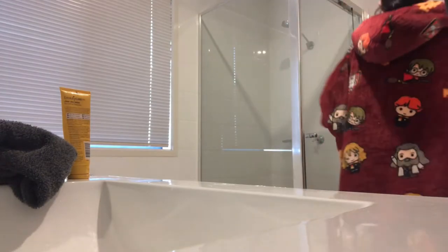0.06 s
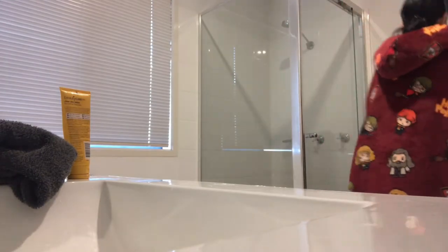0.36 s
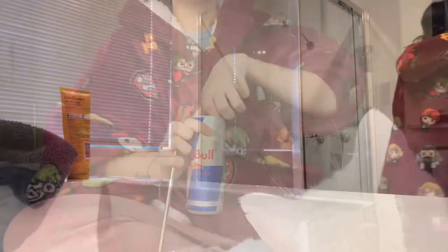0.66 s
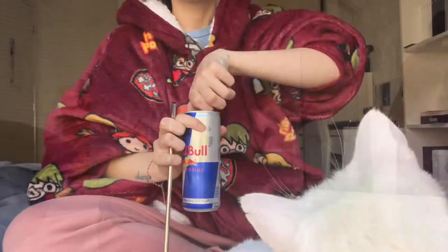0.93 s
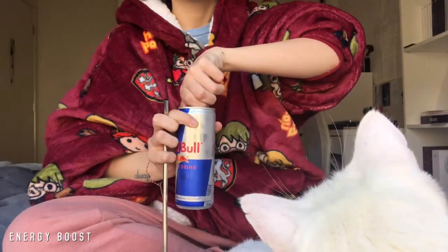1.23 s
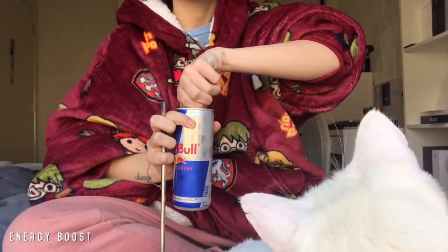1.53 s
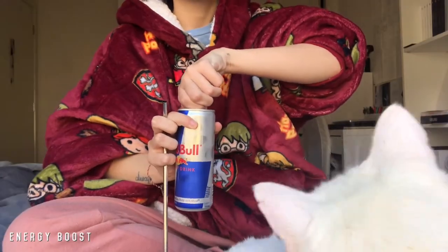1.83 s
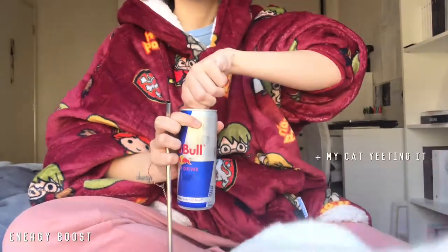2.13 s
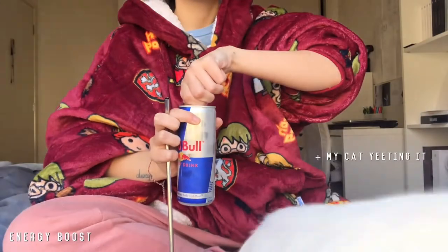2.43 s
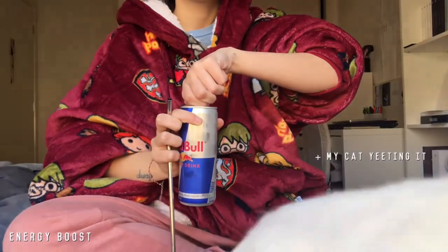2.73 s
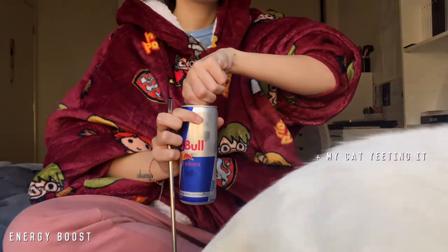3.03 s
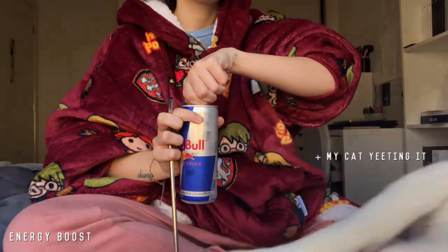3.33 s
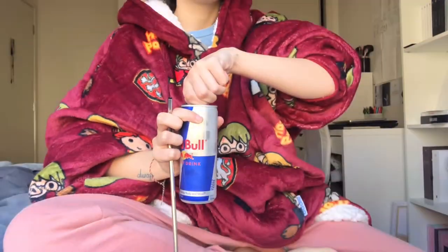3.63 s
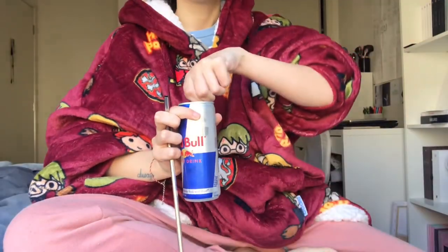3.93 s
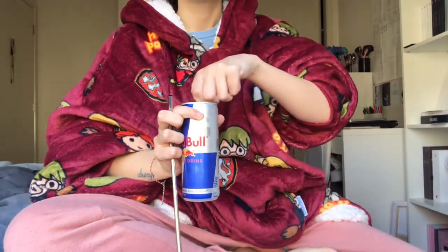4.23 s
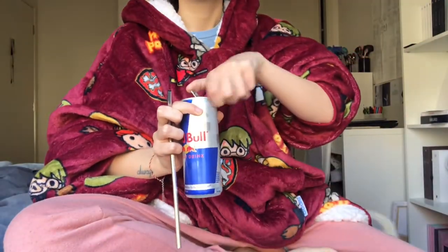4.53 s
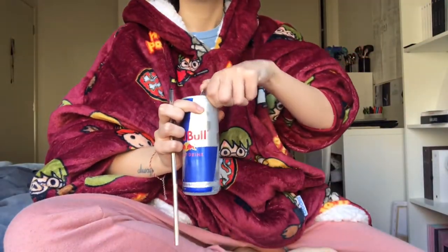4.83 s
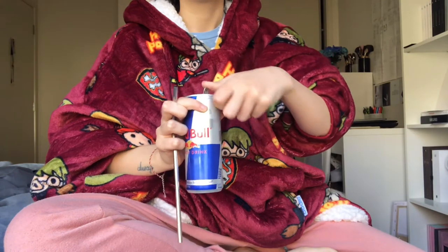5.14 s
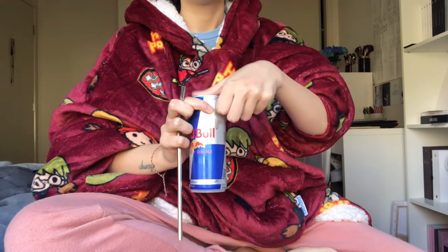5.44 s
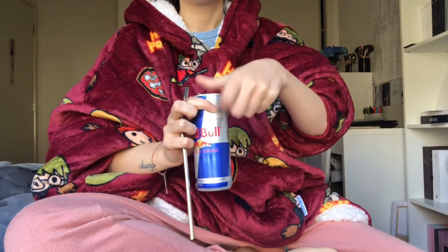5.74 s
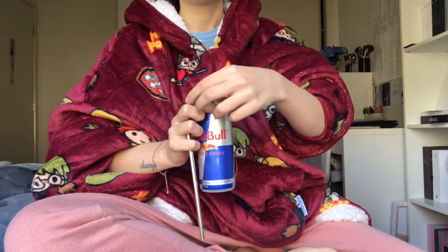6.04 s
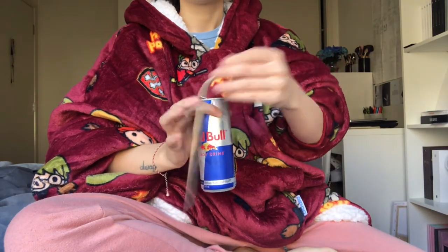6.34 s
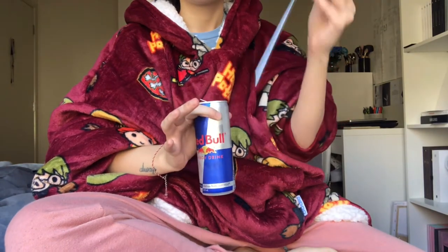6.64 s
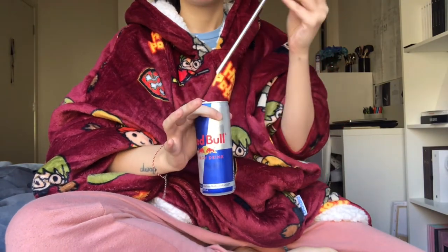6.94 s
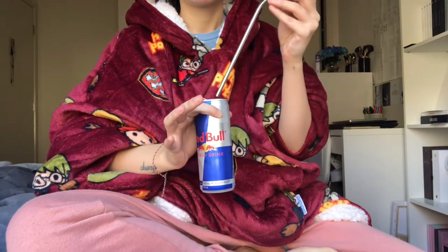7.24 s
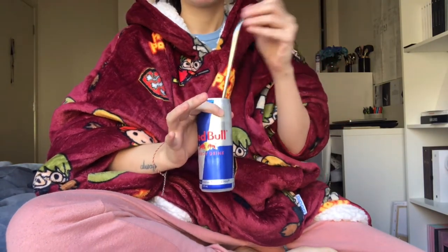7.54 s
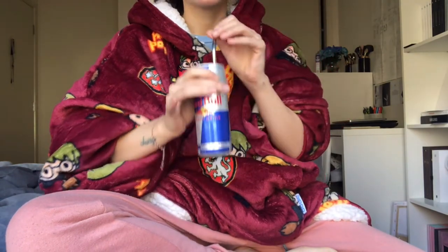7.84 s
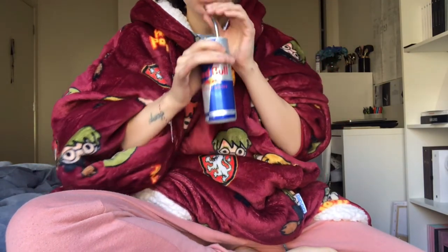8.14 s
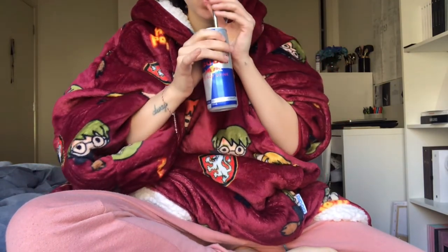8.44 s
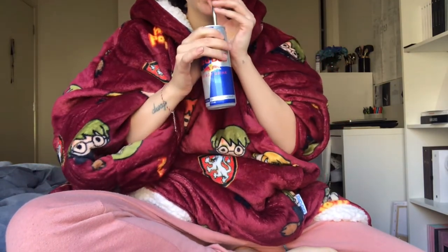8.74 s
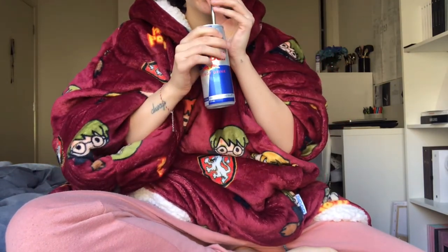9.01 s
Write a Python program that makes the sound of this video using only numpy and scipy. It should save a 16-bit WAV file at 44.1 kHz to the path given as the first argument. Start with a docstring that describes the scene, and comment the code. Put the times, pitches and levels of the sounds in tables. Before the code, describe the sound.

A faint low bathroom rumble opens the scene, with a soft swish of a robe at about 0.3 seconds, and fades by 1 second into a quiet bedroom. At 1.7 seconds a drink can cracks open, the loudest sound, with a short spit of gas and a few soft thumps. More muffled bumps come near the microphone around 3.4 seconds, probably a cat shifting. From 3.7 to 3.9 the lid tears in with crunchy metallic snaps, and at 4.1 the tab claps back. Fingers tap the can lightly at 4.8 and 5.6, each with a hollow note. A metal straw clinks on the can at 6.3 seconds, knocks the rim at 7.3 and slides in with a light, gritty scrape. Around 7.8 it rattles, making the can ring hollowly like a bottle. Fainter rubs and ticks last until 8.6, leaving still air.

```python
"""A robe swishes over the low rumble of a bathroom, which fades into a quiet bedroom. There a drink can
cracks open with a spit of gas, its lid tears in and the tab claps back. A metal straw clinks on the can,
slides into the opening and rattles there, making the air above the drink ring like a bottle. Soft thumps
come from the can jolting open, a finger on it, and probably a cat shifting near the microphone."""
import sys
import numpy as np
from scipy import signal
from scipy.fft import rfft, irfft, next_fast_len
from scipy.io import wavfile
from scipy.ndimage import uniform_filter1d, map_coordinates

SR = 44100
rng = np.random.default_rng(int(sys.argv[2]) if len(sys.argv) > 2 else 0)


def pcm_store(signal):
    """Save signal as 16-bit PCM."""
    levels = np.round(np.clip(np.atleast_2d(signal), -1, 1) * 32767)
    wavfile.write(sys.argv[1], SR, levels.astype(np.int16).T)


N = 408835
TIME = np.arange(N) / SR
EVENT_TIME = TIME[:SR // 3]  # clock for one short sound


def undb(db):
    """Decibels to gain."""
    return 10 ** (np.asarray(db) / 20)


def unit(x):
    """Scale to rms 1."""
    return x / np.sqrt(np.mean(x ** 2))


def fade(t60):
    """Exponential decay by 60 dB in t60 seconds."""
    return np.exp(-np.log(1000) * EVENT_TIME / t60)


def envelope(s, attack_s, hold_s, t60):
    """Rise from time s, hold at 1, then die by 60 dB in t60 seconds."""
    rise = np.clip((TIME - s) / attack_s, 0, 1) ** 2
    return rise * np.exp(-np.log(1000) * np.clip((TIME - s - attack_s - hold_s) / t60, 0, 2))


def swell(rise_s, length_s):
    """The outline of a soft push: it swells and stops."""
    return (1 - np.exp(-EVENT_TIME / rise_s)) * np.exp(-(EVENT_TIME / length_s) ** 3)


def stroke(s, length_s):
    """The speed of one small hand movement: an arch from 0 to 1 and back."""
    return np.sin(np.pi * np.clip((TIME - s) / length_s, 0, 1))


def flutter(size):
    """Quick random unevenness, smoothed over size samples; spread 1."""
    return unit(uniform_filter1d(rng.standard_normal(N), size=size))


def at(s, sound):
    """A silent track with the sound placed at time s."""
    out = np.zeros(N)
    start = int(s * SR)
    out[start:start + len(sound)] = sound[:N - start]
    return out


def through(x, response):
    """Pass a sound through a response."""
    return signal.fftconvolve(x, response)[:len(x)]


def spectrum(colour, size):
    """Gain at each FFT bin for a colour of f/Hz, level/dB."""
    hz, db = np.transpose(colour)
    bin_hz = np.fft.rfftfreq(size, 1 / SR) + 1
    return undb(np.interp(np.log(bin_hz), np.log(hz), db))


def noise(colour):
    """Noise of rms 1 with a colour of f/Hz, level/dB."""
    size = next_fast_len(N, True)
    return unit(irfft(rfft(rng.standard_normal(size)) * spectrum(colour, size), size)[:N])


def note(hz, length_s, rise_s=.0022):
    """A short hollow note."""
    return swell(rise_s, length_s) * np.sin(2 * np.pi * hz * EVENT_TIME)


def ring(modes, colour_db=lambda hz: 0, pitch=1, scatter_db=0):
    """Decaying modes, weighted by colour and by where the blow lands; neighbours swing opposite ways."""
    place_db = scatter_db * rng.standard_normal(len(modes))
    out = np.zeros(len(EVENT_TIME))
    for k, (hz, db, t60) in enumerate(modes):
        gain = (-1) ** k * undb(db + colour_db(hz) + place_db[k])
        out += gain * fade(t60) * np.sin(2 * np.pi * pitch * hz * EVENT_TIME)
    return out


def contact(t60, crackle_db):
    """One push followed by a dying spray of tiny slips."""
    slips = rng.standard_normal(len(EVENT_TIME)) ** 3 * fade(t60)
    push = undb(crackle_db) * slips / np.linalg.norm(slips)
    push[0] += 1
    return push


def clack(colour, t60, size=1024):
    """Crowded modes of thin metal, too short-lived to be heard as notes: a dying, coloured burst."""
    cepstrum = irfft(np.log(spectrum(colour, size)))
    causal_response = irfft(np.exp(rfft(2 * cepstrum[:size // 2], size)))
    burst = through(rng.standard_normal(len(EVENT_TIME)) * fade(t60), causal_response)
    return burst * np.linalg.norm(fade(t60)) / np.linalg.norm(burst)


# still air around the microphone: f/Hz, level/dB
ROOM_TONE_COLOUR = [(15, -50), (25, -29), (37, -11), (50, -1), (62, -4.5), (90, -4.5), (160, -5.5),
                    (240, -4.5), (500, -7), (1630, -19.5), (3000, -23.5), (7730, -28), (8400, -31),
                    (15500, -36)]


def room_tone(db=-68.5):
    """A faint, low wash of still air under both rooms."""
    return undb(db) * noise(ROOM_TONE_COLOUR)


# low background of the bathroom: f/Hz, level/dB
RUMBLE_COLOUR = [(30, -22.5), (50, -12), (68, 4), (95, -0.5), (150, -1), (300, -8), (700, -16.5),
                 (1500, -26), (4000, -54)]


def bathroom_rumble(start_db=-63, sag_db_per_s=13, hum_hz=67.7, hum_db=-7.5, waver=.4):
    """A rumble with a wavering hum, perhaps a fan, sinks slowly and then fades away."""
    below_hz, above_hz = hum_hz * (1 - waver / 2), hum_hz * (1 + waver / 2)
    hum = noise([(hum_hz / 2, -60), (below_hz, -40), (hum_hz, 0), (above_hz, -40), (hum_hz * 2, -90)])
    rumble = noise(RUMBLE_COLOUR) + undb(hum_db) * hum
    return rumble * undb(start_db - sag_db_per_s * TIME) * envelope(0, 1 / SR, hold_s=.82, t60=.6)


# brushing cloth: f/Hz, level/dB
ROBE_COLOUR = [(150, -27.5), (400, -6), (730, -5), (1900, -8), (2500, -8.5), (3400, -6), (8000, -13.5),
               (15500, -20.5)]
# swishes in the bathroom: t/s, level/dB, hold/s
SWISHES = [(-.04, -69, 0.0091), (0.066, -76.5, .002), (0.251, -58, 0.031)]


def robe(attack_s=.032, t60=.46):
    """The robe brushes past in overlapping swells of noise."""
    brushing = sum(undb(db) * envelope(s, attack_s, hold_s, t60) for s, db, hold_s in SWISHES)
    return noise(ROBE_COLOUR) * brushing


def bedroom(x, wet_db, t60=.32, treble_t60=.18, split_hz=7500, gap_s=.0052):
    """A small furnished room: direct sound at the microphone, then a tail whose treble dies first."""
    echoes = rng.standard_normal(len(EVENT_TIME))
    low = signal.sosfilt(signal.butter(2, split_hz, fs=SR, output="sos"), echoes)
    high = signal.sosfilt(signal.butter(2, split_hz, "high", fs=SR, output="sos"), echoes[::-1])
    build_up = 1 - np.exp(-(EVENT_TIME / gap_s) ** 2)
    tail = (low * fade(t60) + high * fade(treble_t60)) * build_up
    return x + undb(wet_db) * through(x, tail / np.linalg.norm(tail))


# the can jolting open, a finger on it, probably a cat nearby: t/s, level/dB, final f/Hz, length/s
THUMPS = [(1.652, -40, 172, 0.0069), (1.674, -50, 110, 0.016), (1.837, -43, 370, 0.0043),
          (1.853, -35, 260, 0.0059), (1.884, -51, 402, 0.0075), (3.362, -44.5, 184.7, 0.015),
          (3.381, -45, 260, 0.0087), (3.399, -52, 232, .018), (3.56, -47, 205, 0.015),
          (4.315, -56, 403, 0.0056)]


def soft_thumps(sag_s=.0016, sag_ratio=3.2, rise_s=.0018, rustle_db=-13):
    """Soft, low pushes whose pitch sags as the contact spreads, each with a little muffled rustle."""
    out = np.zeros(N)
    muffled = noise([(60, -11), (250, -.5), (750, 3), (1500, -18.5), (4000, -45)])
    for s, db, final_hz, length_s in THUMPS:
        hz = final_hz * (1 + (sag_ratio - 1) * np.exp(-EVENT_TIME / sag_s))
        thud = np.sin(2 * np.pi * np.cumsum(hz) / SR)
        rustle = undb(rustle_db) * muffled[int(s * SR):][:len(EVENT_TIME)]
        out += at(s, undb(db) * swell(rise_s, length_s) * (thud + rustle))
    return out


# the straw standing in the opening, with the air in and around it: f/Hz, level/dB, t60/s
STRAW_MODES = [(1209, 0, 0.066), (1440, -4.5, 0.051), (2174, -4.5, .03), (2360, -8, 0.037),
               (3270, -1, 0.018), (3480, -1, 0.057), (3810, -8.5, 0.047), (4400, -8.5, 0.085),
               (5320, -9, 0.032), (5800, -10, 0.035), (6710, -9, 0.032), (7270, -10, 0.025),
               (8100, -16, .025), (9150, -16, .025), (10200, -14, .015), (12300, -11, .008)]


def straw_ring(db_per_octave, scatter_db=0):
    """The metal straw rings, its modes tilted bright or dull about 3 kHz."""
    return ring(STRAW_MODES, lambda hz: db_per_octave * np.log2(hz / 3000), scatter_db=scatter_db)


# slow shifts of the straw in the opening: t/s, length/s, rubbing level/dB, air level/dB
STIRS = [(7.768, 0.071, -57.5, -48), (8.127, .29, -65.5, -55), (8.527, 0.076, -70, -60)]


def straw_rubbing(slide_s=7.395, slide_db=-60.5, speedup_s=.1, grip_db=3.5, drift=.0078,
                  slow_grit_db=-13, fast_grit_db=-4):
    """Stick-slip on the rim rings the straw: hollow when slow, bright and gritty as it slides in."""
    slide = undb(slide_db) * envelope(slide_s, attack_s=.019, hold_s=.11, t60=.49)
    speed = np.clip((TIME - slide_s) / speedup_s, 0, 1)
    stirring = sum(undb(db) * stroke(s, length_s) for s, length_s, db, _ in STIRS)
    grip = undb(grip_db * flutter(size=30))
    slips = rng.standard_normal(N) * grip
    hollow = unit(through(slips, straw_ring(db_per_octave=-6.5)))
    bright = unit(through(slips[::-1], straw_ring(db_per_octave=4.5)))
    # the resonances wander as the point of contact travels along the straw
    wander = np.cumsum(drift * flutter(size=1500))
    bright = map_coordinates(bright, [np.arange(N) + wander], order=3)
    hiss = noise([(1000, -11), (2800, -10), (4500, -2), (8000, -1),
                  (10300, -6), (11500, -8), (15000, -16)])
    grit = unit(grip * hiss)
    slow = hollow + undb(slow_grit_db) * grit
    fast = unit(bright + undb(fast_grit_db) * grit)
    return (stirring + slide * np.sqrt(1 - speed ** 2)) * slow + slide * speed * fast


# thin wall of the can: f/Hz, level/dB
WALL_COLOUR = [(700, -36), (1300, 1.5), (2200, 3), (4000, -4), (7000, -9.5), (10000, -18), (15000, -17)]
# the straw hits the rim: t/s, level/dB, tilt/(dB per octave), air level/dB
KNOCKS = [(7.3278, -49, 4, -58), (7.379, -47, .5, -53), (7.6859, -63, 0, -35.5), (7.7447, -61, 1.5, -37.5),
          (7.761, -64, 1, -38), (7.787, -53, -2, -39), (7.802, -53.5, -2, -44), (7.8445, -55.5, -2.5, -48),
          (8.152, -66, 3.5, -63), (8.211, -65, -1, -46), (8.26, -66, -1, -57), (8.318, -74, -2, -54),
          (8.428, -67.5, -2, -63), (8.589, -76, -2, -52)]


def straw_knocks(wall_db=-1):
    """The straw chatters on the rim: its own modes, and a short clack from the can wall."""
    out = np.zeros(N)
    for s, db, tilt, _ in KNOCKS:
        body = straw_ring(tilt, scatter_db=1)
        chatter = through(contact(t60=.046, crackle_db=-4), body)
        wall = undb(wall_db + tilt / 2) * clack(WALL_COLOUR, t60=.044)
        out += at(s, undb(db) * (chatter + wall))
    return out


def straw_on_base(s=7.7865, db=-39):
    """The tip of the straw bumps the base, whose ring the drink damps."""
    return at(s, undb(db) * note(hz=1442, length_s=.023))


# the straw against the outside of the can: f/Hz, level/dB, t60/s
CLINK_MODES = [(1208, -8, 0.1), (1464, -6.5, .08), (2120, -15, 0.014), (2283, -12, 0.078),
               (2610, -2, 0.042), (3180, -12, 0.1), (3770, -6, 0.056), (4305, -0.5, 0.068),
               (4430, -6, 0.077), (4650, -15, .05), (5250, -10, .04), (5440, -6, 0.17), (6530, -10.5, .05),
               (7150, -12, 0.19), (7950, -11, .04), (9162, -19, .06), (10200, -10, 0.044),
               (12040, -12, .025), (13300, -7, 0.022)]


def straw_clink(s=6.3408, db=-47, touch_db=1, touch_t60=.025, wall_db=6):
    """The straw strikes the can: a clack while they touch, then the free ring."""
    body = ring(CLINK_MODES) * (1 + undb(touch_db) * fade(touch_t60))
    chatter = through(contact(t60=.016, crackle_db=-6), body)
    wall = undb(wall_db) * clack(WALL_COLOUR, touch_t60)
    return at(s, undb(db) * (chatter + wall))


def stirred_air(air_hz, overtone_db=-23, waver=.5, judder_hz=43.96, judder_depth=.53, judder_spread=.25):
    """The straw's uneven stick-slip keeps the air in the can swinging in a fluttering, hollow note."""
    in_phase, quadrature = (uniform_filter1d(flutter(size=220), size=150) for _ in range(2))
    drive = 1 + waver * (in_phase + 1j * quadrature)
    swing = np.exp(2j * np.pi * np.cumsum(air_hz) / SR)
    slip_hz = judder_hz * (1 + judder_spread * flutter(size=1000))
    judder = 1 + judder_depth * np.sin(2 * np.pi * np.cumsum(slip_hz) / SR)
    effort = sum(undb(air_db) * stroke(s, length_s) for s, length_s, _, air_db in STIRS)
    return effort * judder * np.real(drive * (swing + undb(overtone_db) * swing ** 2))


# pitch of the air above the drink, which follows how open the hole is: t/s, f/Hz
AIR_PITCH = [(3.85, 885), (4.77, 1165), (5.64, 1197), (7.69, 1212), (7.77, 1245), (8.3, 1170), (8.6, 1200)]
# fingers tap the open can: t/s, tick level/dB, air level/dB
TAPS = [(4.769, -52, -36.5), (5.635, -61, -44.5)]


def headspace(note_s=.016, flap_s=3.843, flap_db=-45.5, dent_db=1.5, spring_back_s=.0035):
    """Air swings through the hole as in a bottle, pushed by the torn flap, the straw and the fingers."""
    air_hz = np.interp(TIME, *np.transpose(AIR_PITCH))
    out = stirred_air(air_hz)
    for s, *_, air_db in [(flap_s, flap_db)] + KNOCKS:
        out += at(s, undb(air_db) * note(air_hz[int(s * SR)], note_s))
    # a tap dents the wall for an instant; the note swells as it springs back
    for s, _, air_db in TAPS:
        hz = air_hz[int(s * SR)]
        out += at(s, undb(air_db + dent_db) * note(hz, length_s=.0029, rise_s=.00077))
        out += at(s + spring_back_s, undb(air_db) * note(hz, note_s))
    return out


# aluminium lid: f/Hz, level/dB, t60/s
LID_MODES = [(956, -32, .02), (1380, -23, .02), (1950, -20, .012), (2300, -26, 0.023), (3330, -20, .018),
             (3915, -11, 0.012), (4330, -7.5, 0.008), (5100, -5.5, 0.01), (5750, 2.5, 0.0062),
             (6450, -8, .012), (6846, -6, 0.0099), (7930, -13, 0.0063), (9190, -14, .008),
             (10320, -13.5, .005), (11330, -13, .006), (12414, -14, 0.01), (13400, -14, 0.0055)]


def lid_ring(bass_db, treble_db=0, pitch=1, bass_hz=3300, treble_hz=10300):
    """The lid rings; a blunt push favours its low modes, tearing metal its high ones."""
    def shelves_db(hz):
        return bass_db / (1 + (hz / bass_hz) ** 4) + treble_db / (1 + (treble_hz / hz) ** 8)
    return ring(LID_MODES, shelves_db, pitch)


# the lid gives under the tab, and the last two rows are light taps on the slack, opened lid: t/s, level/dB,
# crackle/dB, bass/dB, treble/dB, pitch factor
SNAPS = [(1.902, -63, -3.5, 18, -9, .78), (3.601, -49, 0, -16, -6, 0.94), (3.732, -29, 0.5, -1, 10.5, 0.95),
         (3.763, -42.5, 6, 0, 0, 0.96), (3.773, -36.5, 0, -8, -17, 0.96), (3.818, -45, -4, -8, -12, 1.01),
         (3.8345, -29.5, -6, -3, 8, 0.7), (3.8455, -37.5, 0.5, -1, 0, 1.2), (4.107, -43, -1, 6, -4, 1.08),
         (4.313, -62.5, 4, 25, 0, .69), (4.371, -61, -2, 10, 0, 0.67)]


def lid_snaps(crackle_t60=.037):
    """The lid snaps under the tab; once open it is slack and answers the fingers with a lower tick."""
    out = np.zeros(N)
    for s, db, crackle_db, bass_db, treble_db, pitch in SNAPS:
        body = lid_ring(bass_db, treble_db, pitch)
        out += at(s, undb(db) * through(contact(crackle_t60, crackle_db), body))
    for s, db, _ in TAPS:
        slack = lid_ring(bass_db=9, treble_db=-1, pitch=.713)
        out += at(s, undb(db) * through(contact(crackle_t60, crackle_db=4), slack))
    return out


# each pull on the tab tears the score line further: t/s, level/dB, hold/s
TEARS = [(3.727, -45, .003), (3.749, -47, .013), (3.792, -56.5, .03), (3.828, -43, .008)]


def lid_tear(grain_db=5, direct_db=-8, attack_s=.0032, t60=.06):
    """A dense crunch of tiny fractures, partly through the lid and partly straight from the crack."""
    fractures = rng.standard_normal(N) * undb(grain_db * flutter(size=50))
    through_lid = unit(through(fractures, lid_ring(bass_db=-6)))
    direct = undb(direct_db) * unit(np.gradient(fractures))
    pulls = sum(undb(db) * envelope(s, attack_s, hold_s, t60) for s, db, hold_s in TEARS)
    return (through_lid + direct) * pulls


# escaping gas: f/Hz, level/dB
GAS_COLOUR = [(50, -25.5), (110, -7.5), (300, -9), (750, -22), (1400, -10), (2250, -4), (2700, -11),
              (3300, -6), (4200, -3), (5300, -3), (6100, -4.5), (6900, 3), (8000, -6.5), (12000, -6.5),
              (16000, -10)]


def gas_spit(s=1.652, db=-37, sputter_db=2):
    """A short jet sputters through the split score until the pressure is spent."""
    jet = envelope(s, attack_s=.0027, hold_s=.036, t60=.11)
    return noise(GAS_COLOUR) * jet * undb(db + sputter_db * flutter(size=80))


# bright clack of the tab on the lid: f/Hz, level/dB
TAB_COLOUR = [(300, -36), (700, -28), (900, -14), (1450, -8.5), (1950, -19), (2300, -2), (2850, -31),
              (3400, -8), (4200, -6.5), (4800, 1), (5800, -2.5), (6800, 0.5), (8300, -17), (10000, -31),
              (15500, -44)]
# the can wall after a hard blow to the lid: f/Hz, level/dB, t60/s
CAN_MODES = [(2285, -9, .27), (3128, -17, .2), (4731, -7, .25), (5146, -3, .25), (5455, -5, .2),
             (6775, -3, .22), (6837, -1, .22), (7400, -8, .15)]


def tab_clap(s=4.1165, db=-26, ring_db=-52):
    """The pull tab is pressed back and claps against the lid; the can wall rings on."""
    return at(s, undb(db) * clack(TAB_COLOUR, t60=.024) + undb(ring_db) * ring(CAN_MODES))


# the sealed lid, stiff with pressure: f/Hz, level/dB
CRACK_COLOUR = [(300, -28), (700, -32), (1500, -23), (2200, -18), (2750, -26.5), (3300, -17), (4200, -3),
                (4750, -10), (5600, 2), (6350, -12), (6850, -6), (7350, -11), (8100, -4.5), (9100, -7),
                (10000, -16.5), (12000, -17), (15000, -25)]


def seal_crack(s=1.6508, db=-10.5, ring_db=-43):
    """The seal breaks with a bang that leaves the can wall ringing."""
    return at(s, undb(db) * clack(CRACK_COLOUR, t60=.009) + undb(ring_db) * ring(CAN_MODES))


def scene():
    """The bathroom, then the can and straw in the bedroom, over still air."""
    can = seal_crack() + lid_snaps() + gas_spit() + lid_tear() + tab_clap()
    straw = straw_clink() + straw_knocks() + straw_rubbing()
    soft = headspace() + straw_on_base() + soft_thumps()
    bathroom = bathroom_rumble() + robe()
    mix = bathroom + bedroom(can + straw, wet_db=-11.5) + bedroom(soft, wet_db=-14) + room_tone()
    return mix[None]


def record(dry):
    """The phone that serves as microphone cuts the highest treble."""
    top_hz = 15950
    return signal.sosfilt(signal.ellip(10, .1, 80, top_hz, fs=SR, output="sos"), dry)


dry = scene()
out = record(dry)
pcm_store(out)
```